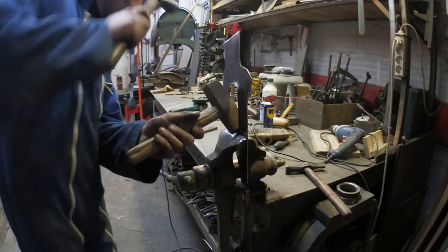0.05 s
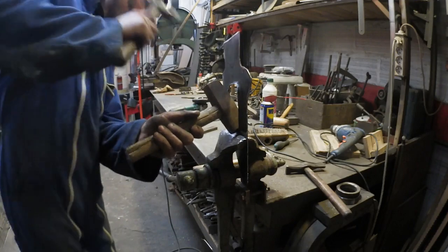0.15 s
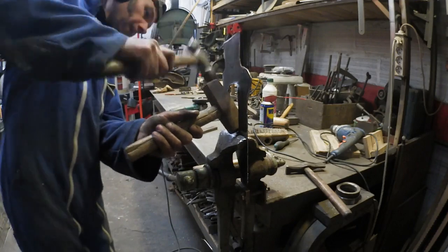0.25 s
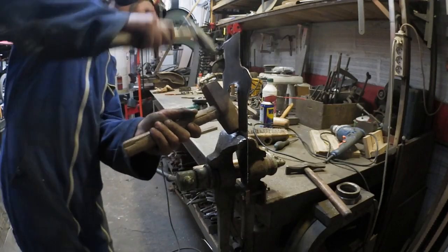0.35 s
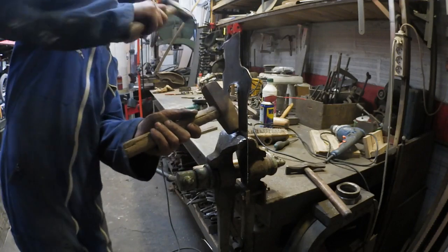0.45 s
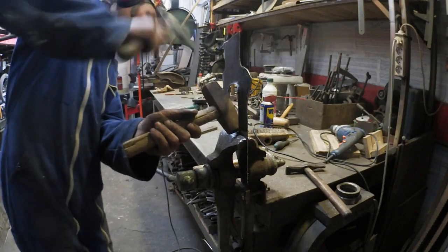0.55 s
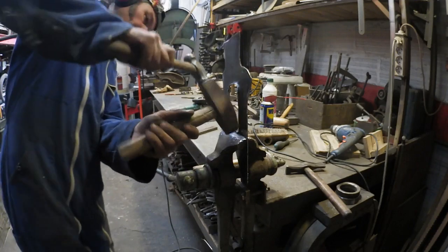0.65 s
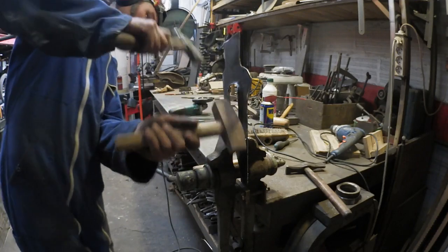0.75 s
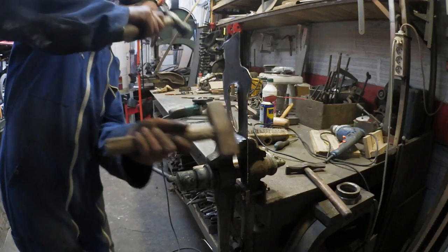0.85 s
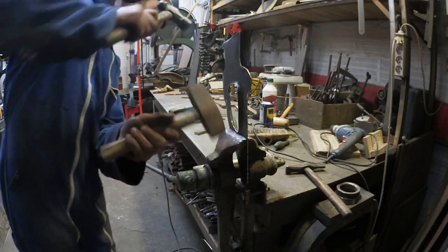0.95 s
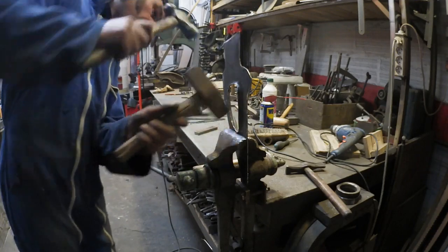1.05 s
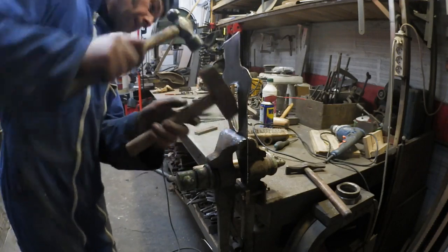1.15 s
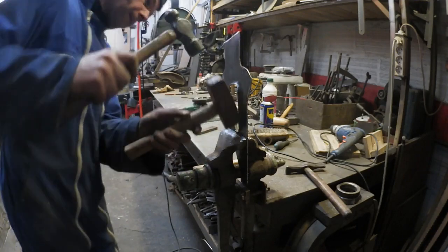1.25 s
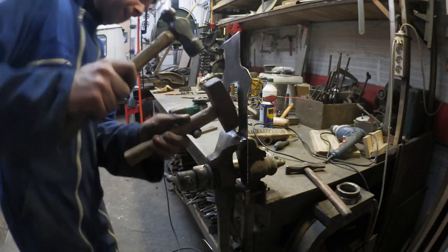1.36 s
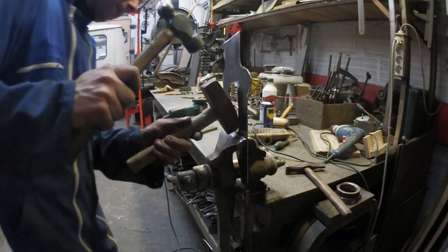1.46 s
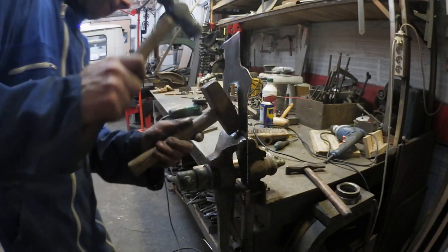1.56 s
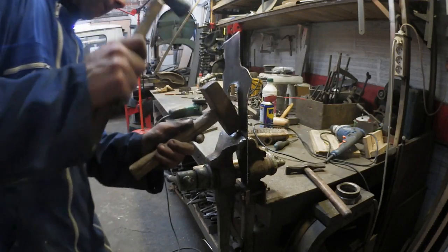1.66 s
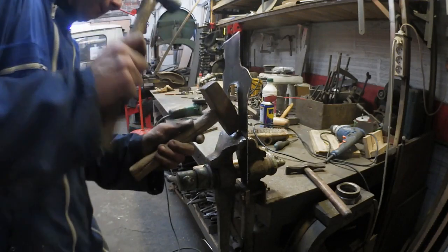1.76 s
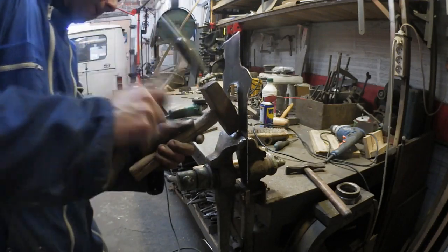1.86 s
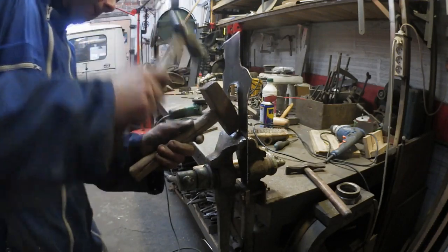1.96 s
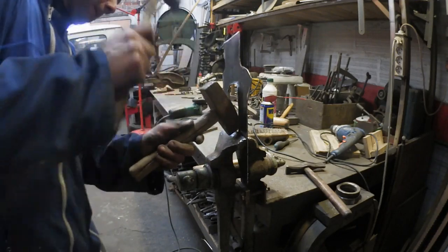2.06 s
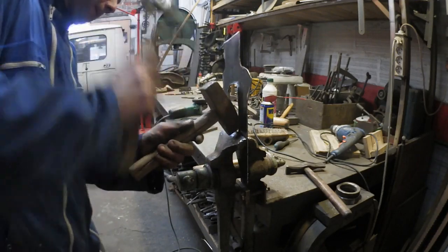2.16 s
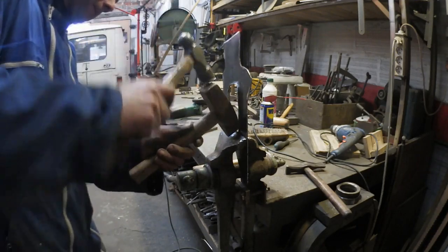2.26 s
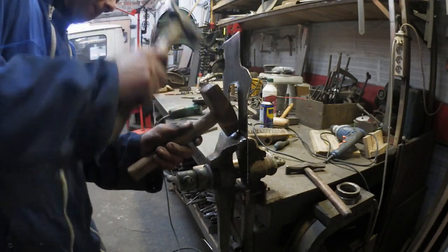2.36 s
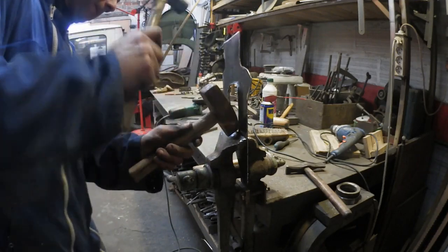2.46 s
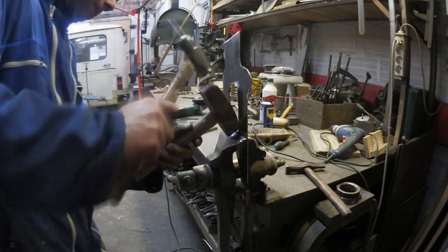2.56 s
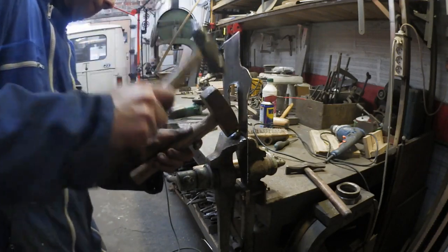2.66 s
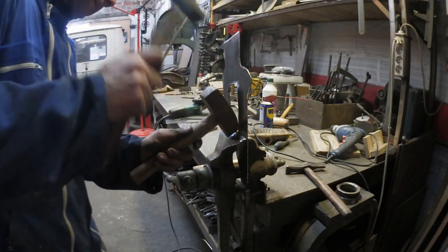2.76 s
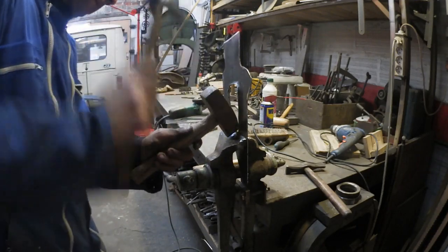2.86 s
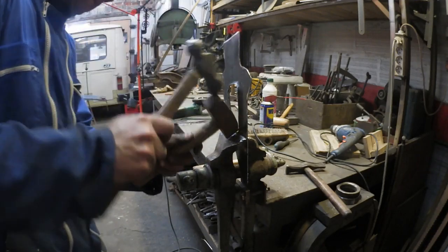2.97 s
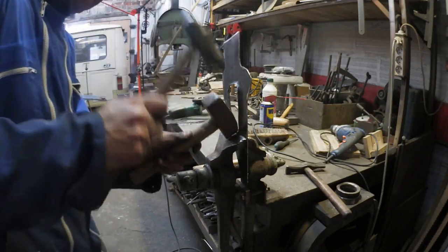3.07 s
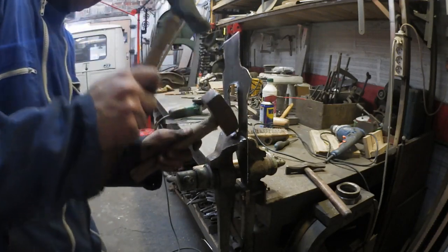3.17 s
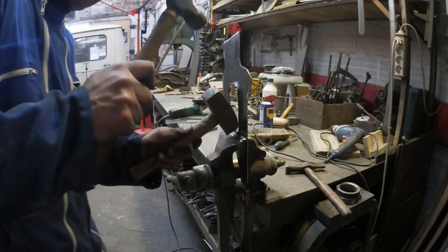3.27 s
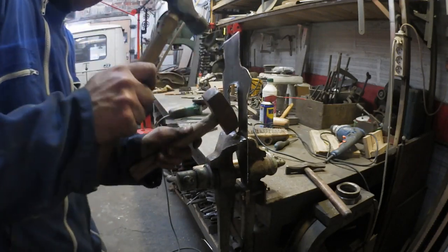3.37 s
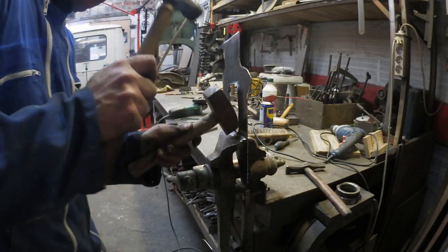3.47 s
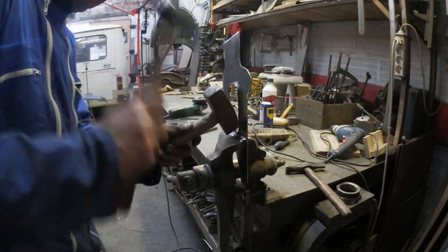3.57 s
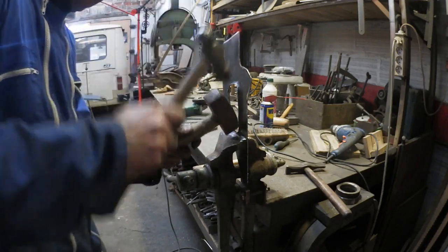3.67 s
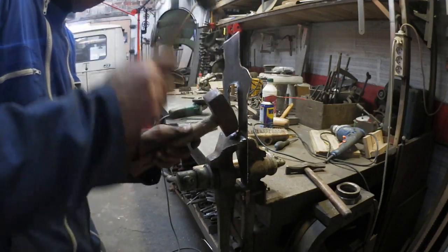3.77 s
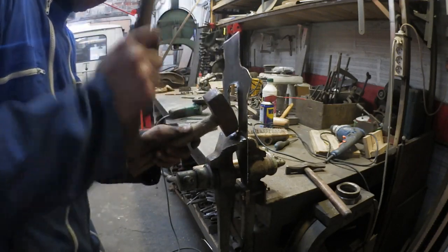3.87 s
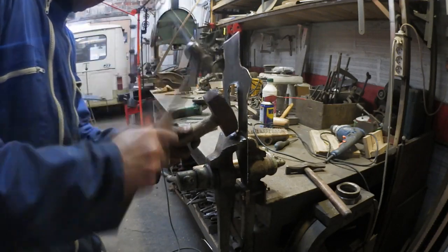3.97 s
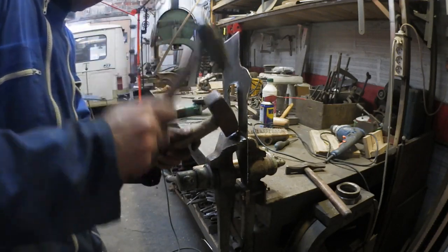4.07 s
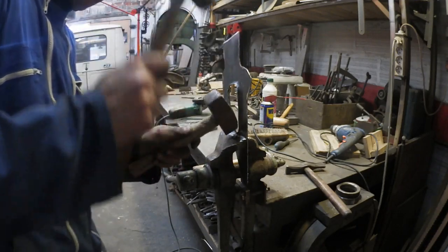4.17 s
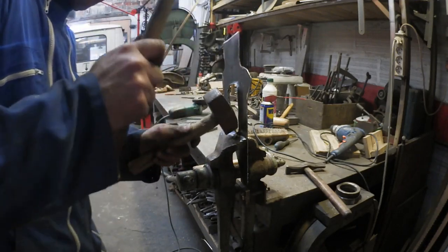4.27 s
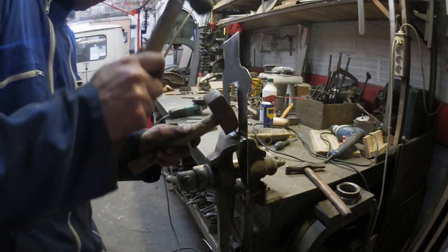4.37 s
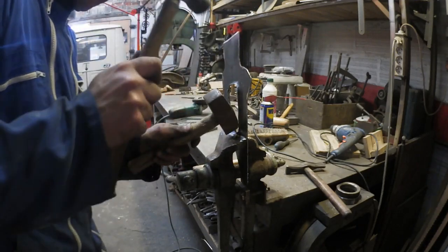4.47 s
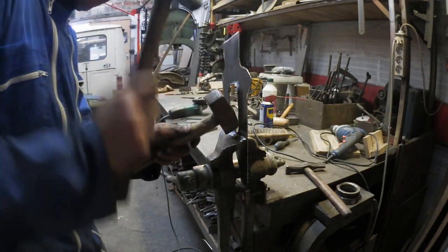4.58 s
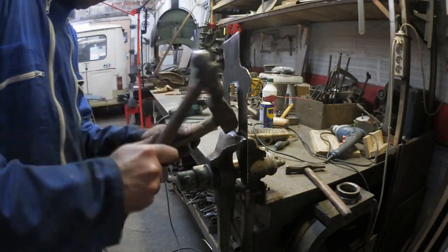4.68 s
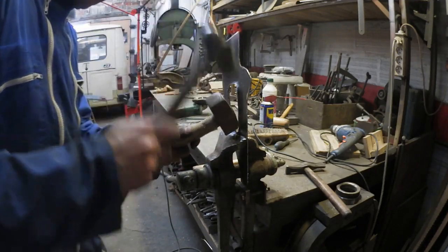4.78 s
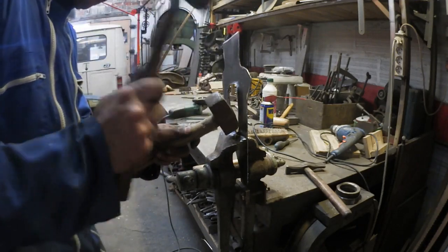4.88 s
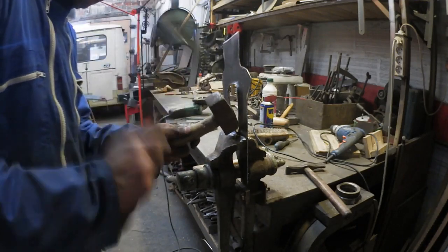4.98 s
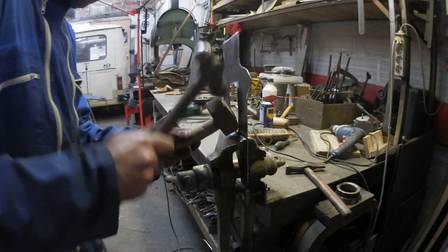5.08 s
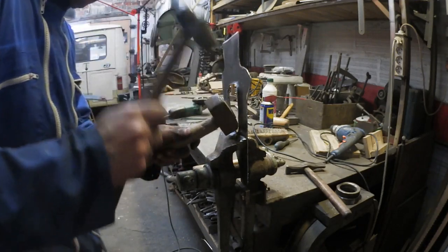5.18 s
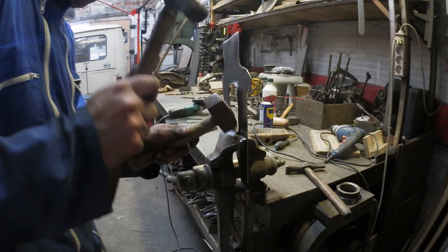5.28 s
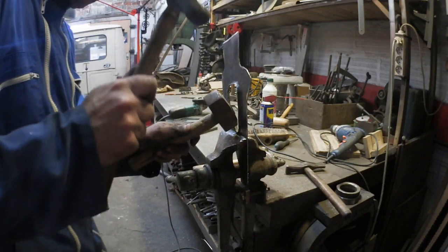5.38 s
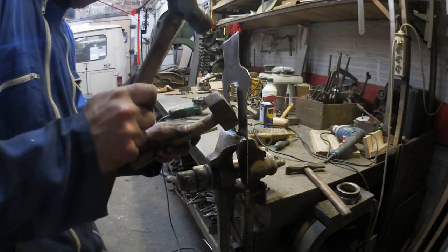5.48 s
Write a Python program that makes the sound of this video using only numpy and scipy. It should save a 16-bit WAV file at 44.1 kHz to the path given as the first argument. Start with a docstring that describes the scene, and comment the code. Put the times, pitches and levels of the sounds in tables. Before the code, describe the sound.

In a large, reverberant workshop, a hand hammer hits a clamped steel sheet about ten times, in groups with pauses. Blows are abrupt, dry at the front and clangy, dying within half a second or so; some leave a thin clear tone. Small metallic ticks and slips of a heavy backing hammer fill an early gap. Near stereo microphone, peaks nearly overloaded.

```python
"""Hammering a clamped steel sheet

A hammer strikes a steel sheet clamped in a bench vice, a heavy hand hammer held behind it, in a large workshop.
Each hard contact is a noise crack with its returns off the nearest surfaces, a bank of wandering sheet modes, a
bench thud and two decaying noise fields; light taps and slips of the tools ring the backing hammer instead. Two
clear tones outlast some blows, over faint shop air and a hiss that drops at every blow and creeps back."""
import sys
import numpy as np
from scipy import signal
from scipy.fft import rfft, irfft, next_fast_len
from scipy.io import wavfile
from scipy.ndimage import uniform_filter1d

SR = 44100
rng = np.random.default_rng(int(sys.argv[2]) if len(sys.argv) > 2 else 0)


def dump(signal):
    """Clip the signal to [-1, 1] and save it as 16-bit WAV at the path in sys.argv[1]."""
    limited = np.clip(np.atleast_2d(signal).T, -1, 1)
    pcm = np.round(limited * 32767).astype(np.int16)
    wavfile.write(sys.argv[1], SR, pcm)


def ratio_of_db(decibels):
    """Turn decibels (scalar or array-like) into linear amplitude factors; 0 dB maps to 1."""
    return 10 ** (np.asarray(decibels, float) / 20)


N = 244314

# hard contacts of the hammer, the first blow bouncing once:
# (t/s, level/dB, relative sheet ring/dB, relative echo/dB, relative bench thud/dB)
HARD_CONTACTS = [(0.3091, 2.5, -7.5, -11, -31.5), (0.3107, 4, -7, -9.5, -50),
                 (0.6664, 0.5, -4.5, -7, -46.5), (1.9377, 2, -5.5, -5.5, -51), (2.2681, 0, -6, -2, -58.5),
                 (2.6243, -3, -6, -0.5, -65), (2.9779, 0, -8.5, -0.5, -58), (3.671, 1.5, -11, -10, -54),
                 (4.0319, 0, -7, -0.5, -50.5), (4.7487, 5, -9, -9.5, -67.5), (5.0876, 2.5, -4, -5.5, -57)]
# how alike left and right are in diffuse sound: (f/Hz, likeness from -1 to 1)
DIFFUSE_LIKENESS = [(60, 0.78), (150, 0.47), (380, 1), (950, 0.78), (2380, 0.45), (5980, -0.03),
                    (15000, 0.08)]


def along(points, hz):
    """(Hz, value) points read on a log axis."""
    f, v = np.transpose(points)
    return np.interp(np.log(hz + 1), np.log(f + 1), v)


def unit(x):
    """Scaled to rms 1."""
    return x / np.sqrt(np.mean(x ** 2) + 1e-20)


def filtered(x, response):
    """x times a complex response of frequency."""
    m = next_fast_len(x.shape[-1] + 4096)
    spectrum = rfft(x, m) * response(np.fft.rfftfreq(m, 1 / SR))
    return irfft(spectrum, m)[..., :x.shape[-1]]


def coloured(x, spectrum):
    """x shaped by (Hz, dB) points, without phase shift."""
    return filtered(x, lambda hz: ratio_of_db(along(spectrum, hz)))


def causal(spectrum):
    """Minimum-phase response with the given colour, so nothing sounds before the hit."""
    def response(hz):
        cepstrum = irfft(np.log(ratio_of_db(np.maximum(along(spectrum, hz), -60))))
        half = len(cepstrum) // 2
        cepstrum[1:half] *= 2
        cepstrum[half + 1:] = 0
        return np.exp(rfft(cepstrum))
    return response


def band(centre_hz, width_hz):
    """One causal resonance."""
    return lambda f: 1j * f * width_hz / (centre_hz ** 2 - f * f + 1j * f * width_hz)


def ports(pair, alike):
    """Two unrelated signals mixed into left and right with the given likeness."""
    def turn(hz):
        return np.arccos(np.clip(along(alike, hz), -1, 1)) / 2
    mid, side = filtered(pair, lambda hz: np.array([np.cos(turn(hz)), np.sin(turn(hz))]))
    return np.array([mid + side, mid - side])


def background():
    """Faint shop air, and a broad hiss that drops at every blow and creeps back."""
    # colour of the hiss: (f/Hz, density/dB)
    hiss_colour = [(120, -33), (200, -4.5), (306, 1.5), (341, -11.5), (450, -9), (714, -8), (783, -12),
                   (2410, -13), (3680, -16), (5130, -11.5), (6290, -19.5), (15000, -27.5), (16400, -43.5)]
    # colour of the quiet shop air: (f/Hz, density/dB)
    air_colour = [(60, -40.5), (100, -22), (140, -11.5), (260, -6), (400, -8), (1200, -9), (3600, -24),
                  (7000, -27), (9100, -58), (15400, -120)]
    start_db, sinks_db_per_s = -46.5, 18.5  # until the first blow
    ducked_db, returns_db_per_s = -90.5, 11  # after every blow

    def noise(colour, alike):
        return unit(ports(coloured(rng.standard_normal((2, N)), colour), alike))

    t = np.arange(N) / SR
    drops = np.transpose(HARD_CONTACTS)[0] - .01  # the hiss drops just ahead of each contact
    since = t - drops[np.searchsorted(drops, t) - 1]
    sinking_db = start_db - sinks_db_per_s * t
    returning_db = ducked_db + returns_db_per_s * since
    hiss_db = np.where(t <= drops[0], sinking_db, returning_db)
    hiss_db = uniform_filter1d(hiss_db, size=400, mode="nearest")
    hiss = ratio_of_db(hiss_db) * noise(hiss_colour, [(500, 0.8), (4000, 0.063)])
    air = ratio_of_db(-79.5) * noise(air_colour, DIFFUSE_LIKENESS)
    return hiss + air


def crack(treble_db, contact_s):
    """Steel meets steel: a short coloured noise burst plus the ping of the hammer face, in two signals."""
    # colour of the crack: (f/Hz, density/dB)
    crack_colour = [(88, -41), (150, -26.5), (1280, -10), (2350, 0), (3640, -4.5), (4800, 5.5), (5160, 2),
                    (6090, -13), (7050, -5.5), (8020, -9.5), (8950, -8.5), (9990, -19.5), (12000, -25),
                    (15600, -51), (22000, -120)]
    t = np.arange(SR // 8) / SR
    burst = rng.standard_normal((2, 2, len(t))) * 0.83
    burst[:, 0, :3] += [1.5, 1.5, -2.5]  # the first touch of the faces is a sharp pressure step
    snap = filtered(burst[0] * ratio_of_db(-60 * t / contact_s), causal(crack_colour))
    snap /= np.abs(snap[0]).max()
    ping = band(14200, 4500)  # the hardened hammer face, over within a few ms
    brief = burst[1] * ratio_of_db(-60 * t / (.5 * contact_s))
    return snap + ratio_of_db(treble_db - 7.5) * filtered(brief, lambda f: ping(f) ** 2)


def echoes(direct, echo_db):
    """The crack back off the nearest surfaces, each a delay through a doubled resonance."""
    # nearest surfaces: (delay/s, relative level/dB, centre f/Hz, width of each resonance/Hz)
    surfaces = [(.0067, 1, 5156, 7930), (0.0101, -13, 3000, 5008), (0.0136, 1.5, 800, 778),
                (.021, -4.5, 750, 800)]
    back = np.zeros_like(direct)
    for delay_s, db, centre_hz, width_hz in surfaces:
        surface = band(centre_hz, width_hz)
        late = np.roll(direct, round(delay_s * SR), axis=1)
        back += ratio_of_db(db + echo_db) * filtered(late, lambda f: surface(f) ** 2)
    return back


def ring(modes, rise_s, blur):
    """Decaying sine modes of the struck steel, with uneven strengths and wandering phases."""
    t = np.arange(SR) / SR
    hz, db, t60 = np.transpose(modes)[:, :, None]
    luck = rng.standard_normal((2, len(modes), 1))
    fade = ratio_of_db(db + 2.5 * luck[0] - 60 * t / t60)
    fade *= 1 - np.exp(-t * hz / (2000 * rise_s))  # low modes take longer to build
    steps = uniform_filter1d(rng.standard_normal((len(modes), SR)), size=80, axis=1)
    drift = np.cumsum(steps, axis=1) * blur * (hz + 800) / 2000  # high modes wander most
    phase = 2 * np.pi * hz * t + drift
    apart = hz / 4000 * luck[1]  # high modes reach the two ports out of step
    left = np.sum(fade * np.sin(phase + apart), 0)
    right = np.sum(fade * np.sin(phase - apart), 0)
    return np.array([left, right])


def thud():
    """The bench jolts the microphone: one slow pressure pulse, stronger on the left."""
    t = np.arange(SR) / SR
    return t / 0.00039 * np.exp(1 - t / 0.00044) * [[1.5], [.4]]


def field(spectrum, t60, rise_s):
    """A reverberant field: noise in which every frequency dies at its own speed."""
    hz, t, z = signal.stft(rng.standard_normal((2, SR)), SR, nperseg=128)
    z = z / np.linalg.norm(ratio_of_db(along(spectrum, hz))) * ratio_of_db(-60 * t / along(t60, hz)[:, None])
    t = np.arange(SR) / SR
    tail = signal.istft(z, SR, nperseg=128)[1][:, :SR] * (1 - np.exp(-t / rise_s))
    return ports(coloured(tail, spectrum), DIFFUSE_LIKENESS)


def hall(rise_s):
    """The workshop answers with an early field and a weaker, longer late one."""
    # colours of the early and the late field: (f/Hz, density/dB)
    early_colour = [(35, -58.5), (60, -30), (146, -19.5), (567, -1.5), (925, -1), (1130, -5.5), (1480, -5),
                    (2460, -10), (2870, -2), (3510, -14.5), (4900, -1.5), (6260, -15), (8940, -22.5),
                    (9770, -30), (12200, -43), (15900, -74), (22000, -120)]
    late_colour = [(35, -68), (60, -47.5), (208, -25), (276, -3.5), (359, -14.5), (476, -5), (531, -8),
                   (592, -8), (646, -7.5), (1880, -10.5), (3390, -16), (5130, -7), (11000, -49.5),
                   (14300, -80), (22000, -120)]
    # decay times of the early and the late field: (f/Hz, t60/s)
    early_t60 = [(100, 0.36), (700, 0.15), (2000, 0.24), (5000, .17), (9000, 0.24), (11500, 0.074),
                 (12500, .02), (16000, .015)]
    late_t60 = [(100, 1), (300, .9), (1000, 0.76), (3000, 0.78), (5000, 0.52), (9000, 0.55), (14000, 0.4)]
    early = ratio_of_db(3.5) * field(early_colour, early_t60, rise_s)
    late = ratio_of_db(-10.5) * field(late_colour, late_t60, rise_s + 0.0019)
    return early + late


def strike(modes, treble_db, thud_db, ring_db, contact_s, hall_db, echo_db, tilt_db, rise_s, blur):
    """One steel-on-steel contact, with all that it sets going; the dB arguments are relative."""
    # how alike left and right are in the crack and its echoes: (f/Hz, likeness from -1 to 1)
    direct_likeness = [(60, 0.74), (180, -0.25), (550, 0.94), (1650, 1), (4970, -0.17), (15000, -0.25)]
    direct = crack(treble_db, contact_s)
    direct = ports(direct + echoes(direct, echo_db), direct_likeness)
    hard = min(1, 0.0023 / rise_s) ** 2  # a soft contact hardly cracks
    sound = hard * np.pad(direct, ((0, 0), (0, SR - direct.shape[1])))
    sound += ratio_of_db(ring_db - 21) * ring(modes, rise_s, blur)
    sound += ratio_of_db(thud_db + 18) * thud()
    sound += ratio_of_db(hall_db) * hall(rise_s)
    # tilt about 2 kHz, with a steep fall above 16 kHz
    tilt = [(250, -3 * tilt_db), (15500, 3 * tilt_db), (16400, 3 * tilt_db - 10), (17200, -55)]
    return filtered(sound, causal(tilt))


def light_touches():
    """Sharp taps and soft slips of the tools, which ring the backing hammer resting on the sheet."""
    # sharp taps: (t/s, level/dB, relative tool ring/dB, relative hall/dB, tilt/dB per octave)
    sharp_taps = [(.0062, -26, 7.5, 1.5, -1.5), (.7963, -24, 9, 2.5, -0.4), (1.2285, -35, 21, 4.5, 0.3),
                  (1.387, -60.5, 8.5, 12, -6), (1.5543, -38.5, -7, 4, -3.2), (3.336, -59.5, 22.5, 13, -2),
                  (5.407, -57.5, 14.5, 10.5, 2), (5.46, -51, 6.5, -0.5, -4), (5.488, -62, 13.5, 3, 4.5)]
    # soft slips along the sheet: (t/s, level/dB, relative tool ring/dB, tilt/dB per octave)
    soft_slips = [(0.031, -30, -20.5, -5), (.245, -28, -12, 0.3), (1.259, -31.5, -6, 0.9),
                  (1.296, -30, 4.5, 0), (1.338, -29, -25, -1.6)]
    # modes of the backing hammer: (f/Hz, relative level/dB, t60/s)
    tool_modes = [(1480, -6, .25), (1868, -11.5, 0.39), (2090, -16, 0.52), (2250, -8.5, .25),
                  (3000, -20, 0.22), (4040, -18.5, .45), (4900, -19.5, 0.28), (5667, -25, 0.2),
                  (7350, -25, 0.22), (7400, -18.5, 0.23), (9300, -25.5, .12)]
    tap_rise_s, slip_rise_s = 0.0014, 0.0066
    touches = [(*tap, tap_rise_s) for tap in sharp_taps]
    touches += [(s, db, ring_db, 0, tilt_db, slip_rise_s) for s, db, ring_db, tilt_db in soft_slips]
    out = np.zeros((2, N + SR))
    for s, db, ring_db, hall_db, tilt_db, rise_s in touches:
        touch = strike(tool_modes, -30, -60, ring_db, contact_s=.012, hall_db=hall_db, echo_db=-5,
                       tilt_db=tilt_db, rise_s=rise_s, blur=.022)
        out[:, round(s * SR):][:, :SR] += ratio_of_db(db) * touch
    return out[:, :N]


def hammer_blows():
    """Hard contacts, the first blow bouncing once; they shake the sheet in the jaws and blur its modes."""
    # modes of the sheet: (f/Hz, relative level/dB, t60/s)
    sheet_modes = [(294.7, -14, 0.29), (348, -15, 0.35), (475, -10.5, 0.39), (561.5, -10.5, 0.21),
                   (619, -9.5, 0.23), (737.6, -2.5, 0.18), (902, -6.5, 0.25), (969, -12, 0.24),
                   (1006, -5.5, 0.2), (1220, -17, 0.44), (1474, -9, 0.38), (1856, -18, 0.23),
                   (2047, -15, 0.29), (2287, -14.5, 0.41), (2356, -16.5, 0.18), (2920, -16.5, 0.3),
                   (3080, -11.5, 0.11), (3275, -11, 0.33), (3700, -8.5, .2), (3942, -20.5, 0.16),
                   (4770, -9.5, 0.33), (4660, -15, 0.3), (5360, -10, .15), (5300, -10, 0.15),
                   (6150, -12, 0.15), (6823, -16, 0.27), (7300, -17, 0.14), (8465, -19, 0.082),
                   (9060, -8.5, 0.04)]
    out = np.zeros((2, N + SR))
    for s, db, ring_db, echo_db, thud_db in HARD_CONTACTS:
        jolt_db = thud_db + 55  # a contact that jolts the bench more is also brighter
        contact = strike(sheet_modes, -5 + 0.27 * jolt_db, thud_db, ring_db, contact_s=0.013,
                         hall_db=-8.5 - db,  # every hard contact fills the hall alike
                         echo_db=echo_db, tilt_db=1.27 + 0.0281 * jolt_db, rise_s=.003, blur=.045)
        out[:, round(s * SR):][:, :SR] += ratio_of_db(db) * contact
    return out[:, :N]


def long_tone():
    """The two clear modes that outlast the others while the sheet sings free, until a touch damps it."""
    # singing blows: (t/s, low tone/dB, its lasting part/dB, high tone/dB, damped at t/s); levels are rms
    singing = [(.32, -40.5, -85, -59.5, .42), (0.679, -39, -55.5, -58, 1.31),
               (2.99, -50.5, -79.5, -44.5, 3.45), (4.761, -48.5, -75, -50, 4.9),
               (5.1, -46.5, -75.5, -38.5, 5.48)]
    low_hz, low_t60_s = 1598, 1.15
    high_hz, high_t60_s = 4995, .55
    damp_t60_s = 0.46
    t, low, high = np.arange(N) / SR, np.zeros(N), np.zeros(N)
    for s, db, lasting_db, high_db, damped_s in singing:
        age = np.maximum(t - s, 0)
        onset = np.clip((t - s) / .012 + 1, 0, 1)
        damping = ratio_of_db(-60 * np.maximum(t - damped_s, 0) / damp_t60_s)
        edge = np.sqrt(2) * onset * damping  # sine peak from rms
        low += edge * (ratio_of_db(db - 60 * age / low_t60_s) + ratio_of_db(lasting_db))
        high += edge * ratio_of_db(high_db - 60 * age / high_t60_s)
    wander = np.cumsum(uniform_filter1d(rng.standard_normal(N), size=80)) * .11  # the high tone shimmers
    low_tone = low * np.sin(2 * np.pi * low_hz * t + [[.3], [-.3]])
    high_tone = high * np.sin(2 * np.pi * high_hz * t + wander + [[.7], [-.7]])
    return low_tone + high_tone


def scene():
    """Shop, tools and sheet together."""
    return background() + light_touches() + hammer_blows() + long_tone()


def low_pass(x):
    """Removes everything above the highest recorded frequency."""
    return signal.sosfilt(signal.butter(12, 16550, fs=SR, output="sos"), x)


def record(dry):
    """The ports lean a little to one side; peaks clip softly."""
    # balance of the ports: (f/Hz, left minus right/dB)
    port_balance = [(60, -4.5), (180, -1), (550, -3.5), (1650, -1.5), (4970, -2.5), (15000, -3)]
    x = filtered(dry, lambda hz: ratio_of_db(along(port_balance, hz) * [[.5], [-.5]]))
    x = x / (1 + np.abs(x / 1.1) ** 6) ** (1 / 6)
    return low_pass(x)


dry = scene()
out = record(dry)
dump(out)
```